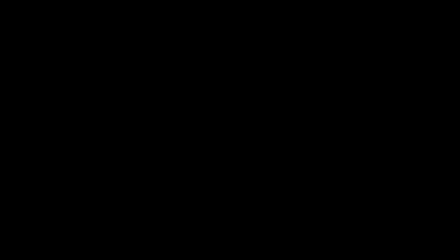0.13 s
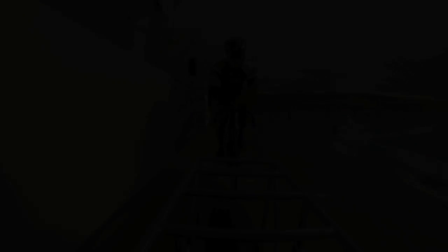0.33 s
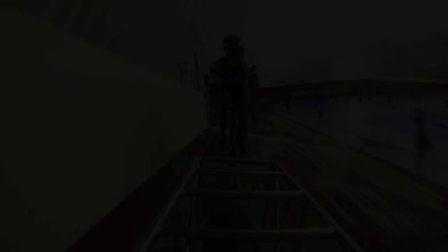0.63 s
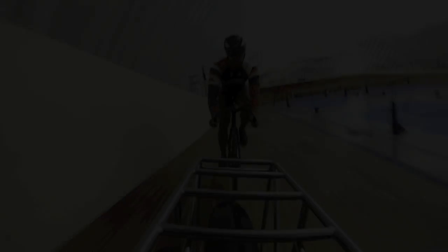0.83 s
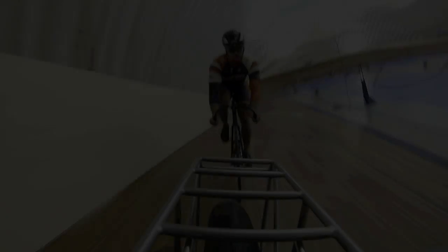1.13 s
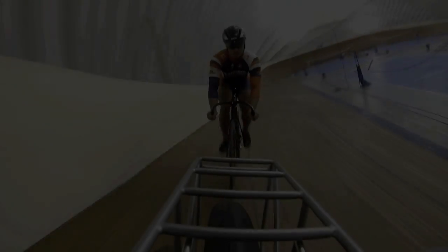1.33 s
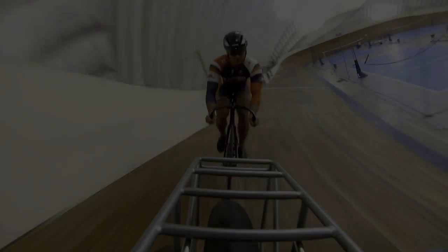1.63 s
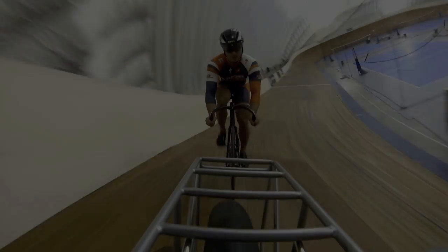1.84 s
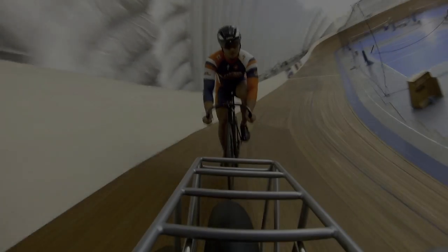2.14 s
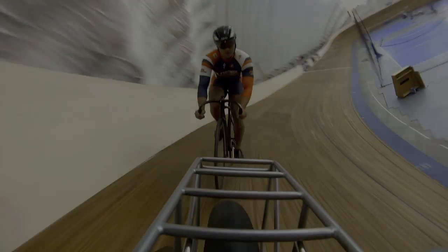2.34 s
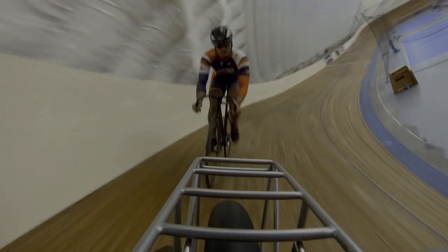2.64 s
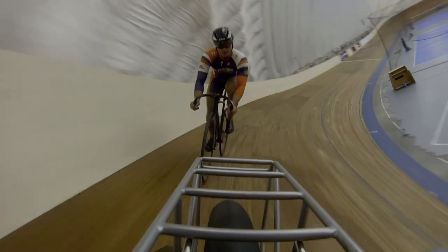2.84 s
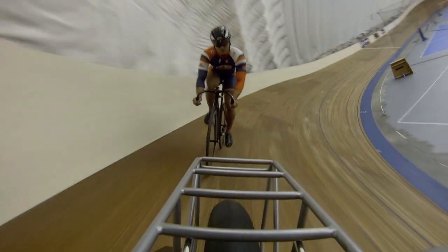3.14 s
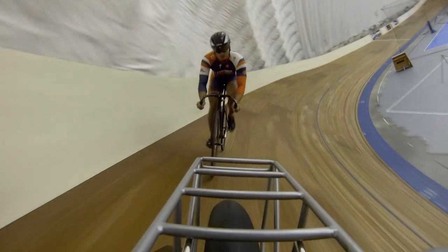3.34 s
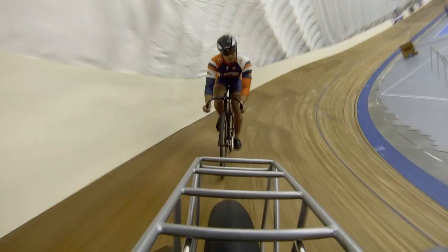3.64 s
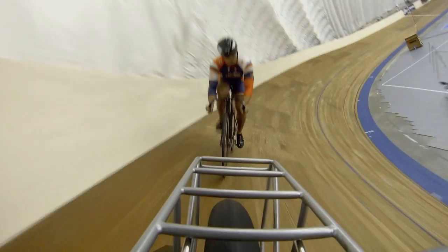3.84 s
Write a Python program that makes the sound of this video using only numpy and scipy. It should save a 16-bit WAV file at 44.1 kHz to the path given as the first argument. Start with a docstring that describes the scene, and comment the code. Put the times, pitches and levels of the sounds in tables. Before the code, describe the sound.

Low motorbike drone with buffeting wind and loose steel chatter swells steadily from silence on an indoor track.

```python
"""Pacing motorbike on the boards

A pacing motorbike laps an indoor wooden cycle track, heard from a closed camera on its rear roller frame.
Harmonics make the engine drone and drive whine, a swaying sine the frame boom; filtered noise makes
the engine clatter, wind rumble and tyre roar. Loose steel ticks at random and chatters in runs of decaying
noise after bumps; a joint squeaks three times. All of it fades in steadily, still rising at the end."""
import sys
import numpy as np
from scipy import signal
from scipy.fft import rfft, irfft, next_fast_len
from scipy.io import wavfile
from scipy.ndimage import map_coordinates

SR = 44100
rng = np.random.default_rng(int(sys.argv[2]) if len(sys.argv) > 2 else 0)


def dump(signal):
    """Clip the signal to [-1, 1] and save it as 16-bit WAV at the path in sys.argv[1]."""
    limited = np.clip(np.atleast_2d(signal).T, -1, 1)
    pcm = np.round(limited * 32767).astype(np.int16)
    wavfile.write(sys.argv[1], SR, pcm)


N = 176400  # samples: 4 s

# Level curves are ahead of their layer's trim and any fluctuation; all levels are ahead of the fade-in.
# Pitch curves are ahead of their wander. Spectra and harmonic levels set balance only.

# Engine firing rate: (time [s], rate [firings/s])
FIRING_RATE = [(.2, 47.9), (.7, 50.7), (.9, 48.5), (1.5, 45.7), (2.4, 45.1), (3.05, 48), (3.3, 50), (4, 43)]
# Exhaust drone: (time [s], level [dB])
DRONE_LEVEL = [(0.18, -8), (0.44, -16), (0.57, -16), (0.66, -31), (0.76, -12.5), (1.07, -13), (1.23, -20.5),
               (1.33, -8.5), (1.45, -30), (1.57, -13), (1.71, -18), (1.97, -16.5), (2.5, -13.5),
               (2.93, -15), (3.7, -19), (3.8, -27), (3.9, -18), (3.99, -15.5)]
# Exhaust harmonics: (multiple of the firing rate, relative level [dB])
DRONE_HARMONICS = [(1, 6.5), (2, -14), (3, -26.5), (4, -12.5), (5, -23.5), (6, -25.5), (7, -31)]
# Engine mechanism: (time [s], level [dB])
CLATTER_LEVEL = [(.15, -33), (.3, -39.5), (.6, -33), (.95, -42), (1.3, -36), (1.55, -34.5), (1.68, -42.5),
                 (1.9, -32.5), (2.15, -39), (2.45, -34.5), (2.75, -38.5), (3.25, -36), (3.55, -34.5),
                 (4, -38.5)]
# Spectrum of the engine mechanism: (frequency [Hz], relative density [dB per Hz])
CLATTER_SPECTRUM = [(500, -41), (950, -32.5), (1090, -6.5), (1190, -12.5), (1320, 0), (1420, -12),
                    (1530, 6.5), (1660, -2.5), (1830, -9), (2080, -4), (2300, -6), (2550, -11), (2900, -10),
                    (3300, -22), (3650, -23.5), (3850, -32.5), (4300, -39), (4700, -26), (4900, -37),
                    (5150, -27), (5700, -22), (6050, -41.5), (6700, -50), (7600, -49), (7950, -38),
                    (8400, -54.5), (10500, -63), (12500, -60.5), (15500, -73)]

# The frame's low resonance: (time [s], level [dB])
BOOM_LEVEL = [(0.18, -33), (0.3, -18.5), (0.35, -40), (0.38, -15.5), (0.71, -18.5), (0.76, -31),
              (0.79, -13.5), (0.92, -25.5), (0.96, -20), (1.23, -24), (1.31, -25), (1.46, -28),
              (1.5, -17.5), (2.05, -24), (2.1, -11), (2.19, -28), (2.32, -17), (2.37, -32), (2.52, -19.5),
              (2.57, -21), (2.63, -13.5), (2.83, -23), (2.9, -22), (2.97, -15), (3.09, -17), (3.21, -25.5),
              (3.33, -19), (3.56, -19.5), (3.61, -14.5), (3.75, -21), (3.88, -13), (3.99, -21.5)]
# Pitch of that resonance: (time [s], frequency [Hz])
BOOM_PITCH = [(.3, 154), (1.3, 153), (1.7, 158), (2.3, 155), (2.5, 152), (2.65, 158), (3.05, 150),
              (3.35, 156), (3.55, 152), (4, 156)]

# Drive whine fundamental: (time [s], frequency [Hz])
WHINE_PITCH = [(.2, 427), (1.15, 424.2), (1.55, 404), (2.3, 399.6), (2.8, 405.5), (3.7, 411), (4, 408.8)]
# Drive whine: (time [s], level [dB])
WHINE_LEVEL = [(0.18, -36.5), (0.28, -50), (0.39, -40), (1.12, -46.5), (1.54, -33.5), (1.63, -46),
               (1.91, -31), (2.0, -40.5), (2.64, -35.5), (2.72, -40.5), (3.85, -37.5), (3.99, -43.5)]
# Drive whine harmonics: (multiple of the fundamental, relative level [dB])
WHINE_HARMONICS = [(1, -3), (2, -15), (3, -17.5), (4, -7.5)]

# Wind on the housing: (time [s], level [dB])
WIND_LEVEL = [(0.18, -30), (0.72, -20), (0.83, -30), (1.36, -25.5), (1.45, -21.5), (1.51, -24),
              (1.57, -19.5), (1.69, -32), (1.97, -21.5), (2.19, -31.5), (2.39, -21), (2.45, -22.5),
              (2.79, -27), (3.28, -22), (3.49, -24), (3.55, -22.5), (3.66, -25.5), (3.99, -26)]
# Wind spectrum: (frequency [Hz], relative density [dB per Hz])
WIND_SPECTRUM = [(8, -22.5), (18, 2), (40, 6.5), (60, 3), (80, -4), (110, -3), (140, 7.5), (195, 1),
                 (220, -6.5), (280, -12), (330, -17), (370, -25.5), (470, -30), (700, -66.5), (2000, -100)]
# Tyres on the boards: (time [s], level [dB])
TYRE_LEVEL = [(.18, -35), (.27, -40.5), (.57, -39), (.9, -41), (1.1, -44.5), (1.2, -40.5), (1.44, -36.5),
              (1.63, -45), (1.9, -36), (2.14, -48), (2.4, -39), (2.8, -42), (3.2, -40), (3.3, -33.5),
              (3.38, -43.5), (3.54, -38.5), (4, -40)]
# Tyre spectrum: (frequency [Hz], relative density [dB per Hz])
TYRE_SPECTRUM = [(300, -48.5), (500, -14.5), (560, -8), (595, 5.5), (640, 2.5), (720, -3.5), (770, -12),
                 (820, -10), (980, -17), (1300, -34), (4000, -83)]

# Ring of the steel frame in the camera housing: (frequency [Hz], relative density [dB per Hz])
STEEL_SPECTRUM = [(200, -34), (400, -29.5), (630, -13.5), (800, -17.5), (970, -24), (1120, -7.5),
                  (1300, -17.5), (1480, -8), (1660, 3.5), (1870, -8), (2100, 3), (2400, -14), (2800, -5.5),
                  (3000, -15), (3300, -3.5), (3700, -24), (3950, -11.5), (4250, -26), (4700, -14),
                  (4900, -19), (5100, -8.5), (5250, -22.5), (5500, -6.5), (5800, -26.5), (6050, -29),
                  (6350, -23.5), (6750, -44.5), (7350, -21.5), (7650, -31.5), (8050, -19.5), (8600, -34),
                  (9500, -42.5), (10400, -42.5), (11200, -32), (12700, -31.5), (14300, -37), (15500, -36.5)]
# Squeaks of a rubbing joint: (time [s], length [s], pitch [Hz], peak level [dB])
SQUEAKS = [(0.237, 0.025, 2330, -34), (1.451, 0.025, 2450, -32), (2.515, 0.041, 2310, -31)]
# Bursts of chatter: (time [s], length [s], level [dB], gain above BRIGHT_HZ [dB])
RATTLES = [(0.708, .012, -25, 6.5), (0.829, .007, -24, 2.5), (0.909, .007, -36, -1),
           (1.159, .003, -29.5, 1.5), (1.171, 0.0028, -22, -3), (1.179, .034, -14.5, -3.5),
           (1.273, .016, -19, 0), (1.304, .003, -28, 3.5), (1.334, .008, -37.5, 1.5), (1.4, .012, -18, -2),
           (1.466, .018, -29.5, -13), (1.490, .003, -19, 4.5), (1.881, .003, -27, -3.5),
           (1.928, .009, -27, -6.5), (2.021, .005, -41, -6), (2.052, .027, -20.5, 1),
           (2.135, .003, -20.5, -1), (2.638, .024, -21, 1.5), (2.276, .003, -31, -7.5),
           (2.751, .022, -34, -4), (2.777, .007, -32, -1), (2.918, .024, -33, -10), (3.05, .007, -36, -7),
           (3.128, .020, -29, -8.5), (3.174, .025, -26.5, -14), (3.278, .020, -25, -16),
           (3.293, .003, -22.5, 8.5), (3.557, .004, -32.5, -2), (3.735, .004, -15, -2.5),
           (3.755, .003, -28.5, 10), (3.827, .015, -27.5, -15), (3.847, .034, -20.5, 4),
           (3.936, .015, -24, 2), (3.962, .003, -26.5, -3)]

# Layer trims [dB]
DRONE_DB, BOOM_DB, WHINE_DB, WIND_DB, TYRES_DB, RATTLE_DB = -6.5, -3.5, 0, 2, -1, 6.5
BOOM_WANDER_HZ = 1.47
TICKS_PER_S, TICK_DB, TICK_SCATTER_DB, TICK_T60_S = 14, -41.5, 1.5, 0.0091
CONTACTS_PER_S, CONTACT_SCATTER_DB = 215, 0.4
CONTACT_ATTACK_S, CONTACT_T60_S = 0.00041, 0.015
TAIL_T60_S, TAIL_DB = 0.05, -21  # a weaker, slower second decay
BRIGHT_HZ = 4000
FADE_START_S, FADE_END_S = 0.087, 4.12
TOP_HZ = 15700


def amp(db):
    """Decibels to gain."""
    return 10 ** (np.asarray(db) / 20)


def unit(x):
    """Scale to rms 1."""
    return x / np.sqrt(np.mean(x ** 2) + 1e-20)


def along(points, hz):
    """Read (frequency [Hz], value) points on a log-frequency axis."""
    f, v = np.transpose(points)
    return np.interp(np.log(hz + 1), np.log(np.sort(f) + 1), v)


def curve(rows):
    """One value per sample from (time [s], value) rows."""
    return np.interp(np.arange(N) / SR, *np.transpose(rows))


def wobble(rate):
    """A smooth random curve with rate knots a second."""
    position = np.arange(N) * rate / SR
    return map_coordinates(rng.standard_normal(N // 16), [position + 2], mode="mirror")


def coloured(x, spectrum):
    """Filter x causally (minimum phase, unit power) to the given spectrum."""
    m = 2 * next_fast_len(N // 2 + SR // 4)
    gain = unit(amp(along(spectrum, np.fft.rfftfreq(m, 1 / SR))))
    cepstrum = irfft(np.log(gain))
    # Folding the cepstrum onto positive time makes the filter minimum phase
    cepstrum[1:m // 2] *= 2
    cepstrum[m // 2 + 1:] = 0
    response = np.exp(rfft(cepstrum))
    return irfft(rfft(x, m) * response, m)[:N]


def rush(spectrum):
    """Coloured noise of rms 1."""
    return unit(coloured(rng.standard_normal(N), spectrum))


def turning(hz):
    """Phase [rad] of something that cycles hz times a second."""
    return 2 * np.pi * np.cumsum(hz) / SR


def partials(phase, harmonics, flutter_db, flutter_rate):
    """Harmonics of one rotation, each fluttering on its own, mixed to rms 1."""
    mix = np.zeros(N)
    for multiple, db in harmonics:
        level = amp(db + flutter_db * wobble(flutter_rate))
        mix += level * np.sin(round(multiple) * phase + rng.uniform(0, 2 * np.pi))
    return unit(mix)


def engine(clatter_depth=0.13, shake_db=1.7, tappet_db=3):
    """The exhaust drones at the firing rate; noise from the mechanism pulses in step with it."""
    phase = turning(curve(FIRING_RATE) + 0.52 * wobble(14))
    harmonics = partials(phase, DRONE_HARMONICS, flutter_db=0.7, flutter_rate=18)
    drone = amp(curve(DRONE_LEVEL) + DRONE_DB) * harmonics

    roughness = amp(tappet_db * wobble(700))
    pulse = 1 + clatter_depth * np.cos(phase)
    grains = rng.standard_normal(N) * roughness * pulse
    clatter_gain = amp(curve(CLATTER_LEVEL) + shake_db * wobble(24.47))
    return drone + clatter_gain * unit(coloured(grains, CLATTER_SPECTRUM))


def frame_boom(swell_db=1):
    """The shaken frame sways at its low resonance, in uneven swells."""
    phase = turning(curve(BOOM_PITCH) + BOOM_WANDER_HZ * wobble(24.11))
    gain = amp(curve(BOOM_LEVEL) + BOOM_DB + swell_db * wobble(35))
    return gain * unit(np.sin(phase))


def drive_whine(jitter=.011, waver=0.008235):
    """The drive sings in harmonics on a gliding pitch, with a slower waver and a rougher flutter."""
    drift = 1 + jitter * wobble(70) + waver * wobble(13)
    phase = turning(curve(WHINE_PITCH) * drift)
    harmonics = partials(phase, WHINE_HARMONICS, flutter_db=3.2, flutter_rate=33)
    return amp(curve(WHINE_LEVEL) + WHINE_DB) * harmonics


def wind(buffet_db=1):
    """Air buffets the housing: low noise that surges unevenly."""
    return amp(curve(WIND_LEVEL) + WIND_DB + buffet_db * wobble(22)) * rush(WIND_SPECTRUM)


def tyres(boards_db=1.57):
    """The tyres roar over the boards: mid-range noise that fluctuates."""
    return amp(curve(TYRE_LEVEL) + TYRES_DB + boards_db * wobble(21)) * rush(TYRE_SPECTRUM)


def ticks():
    """Vibration taps the loose steel lightly and at random; each tap is a short decay of steely noise."""
    struck = rng.random(N) < TICKS_PER_S / SR
    taps = struck * amp(TICK_DB + TICK_SCATTER_DB * rng.standard_normal(N))
    decay = amp(-60 * np.arange(SR // 20) / SR / TICK_T60_S)
    envelope = signal.fftconvolve(taps, decay)[:N]
    bright_noise = np.diff(rng.standard_normal(N + 1))
    return coloured(envelope * bright_noise, STEEL_SPECTRUM)


def squeaks(waver=.02):
    """A joint rubs and sings briefly: sines of wavering pitch under half-sine swells."""
    t = np.arange(N) / SR
    drift = 1 + waver * wobble(250)
    out = np.zeros(N)
    for start, length, hz, db in SQUEAKS:
        swell = np.sin(np.pi * np.clip((t - start) / length, 0, 1))
        out += amp(db) * swell * np.sin(turning(hz * drift))
    return out


def rattles(scatter=.12, alike=0.48, first_db=-3):
    """Each bump starts a run of quick steel contacts: decaying noises partly alike within the run."""
    t = np.arange(SR // 8) / SR
    decay = amp(-60 * t / CONTACT_T60_S) + amp(TAIL_DB - 60 * t / TAIL_T60_S)
    envelope = decay * (1 - np.exp(-t / CONTACT_ATTACK_S))
    split = signal.butter(2, BRIGHT_HZ, fs=SR, output="sos")
    out = np.zeros(N + SR)
    for start, length, db, bright_db in RATTLES:
        count = 1 + int(length * CONTACTS_PER_S)
        shared = rng.standard_normal(len(t))
        own = rng.standard_normal((count, len(t)))
        noise = np.sqrt(alike) * shared + np.sqrt(1 - alike) * own
        low = signal.sosfiltfilt(split, noise)
        rings = envelope * (low + amp(bright_db) * (noise - low))

        late, size = rng.standard_normal((2, count))
        k = np.arange(count)
        # The first contact is on time and its level is offset by first_db
        times = start + (k + scatter * late * (k > 0)) / CONTACTS_PER_S
        sizes = amp(CONTACT_SCATTER_DB * size + first_db * (k == 0))
        gains = amp(db + RATTLE_DB) * unit(sizes)
        for time, gain, ring in zip(times, gains, rings):
            out[round(time * SR):][:len(t)] += gain * ring
    return coloured(out[:N], STEEL_SPECTRUM)


def scene():
    """All layers summed into one channel."""
    bike = engine() + frame_boom() + drive_whine()
    surroundings = wind() + tyres()
    loose_parts = ticks() + squeaks() + rattles()
    return (bike + surroundings + loose_parts)[None]


def record(dry):
    """A straight fade-in, then the camera's band limit: a very steep low-pass."""
    fade = np.clip((np.arange(N) / SR - FADE_START_S) / (FADE_END_S - FADE_START_S), 0, 1)
    m = next_fast_len(N + SR // 2)
    band = 1 / np.sqrt(1 + (np.fft.rfftfreq(m, 1 / SR) / TOP_HZ) ** 200)
    return irfft(rfft(dry * fade, m) * band, m)[..., :N]


dry = scene()
out = record(dry)
dump(out)
```